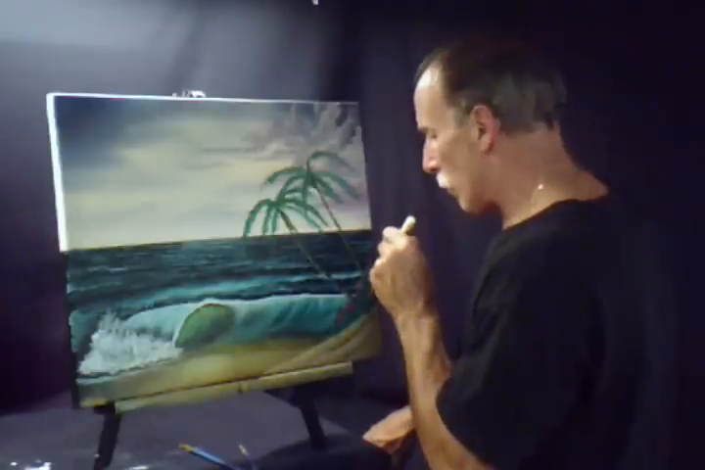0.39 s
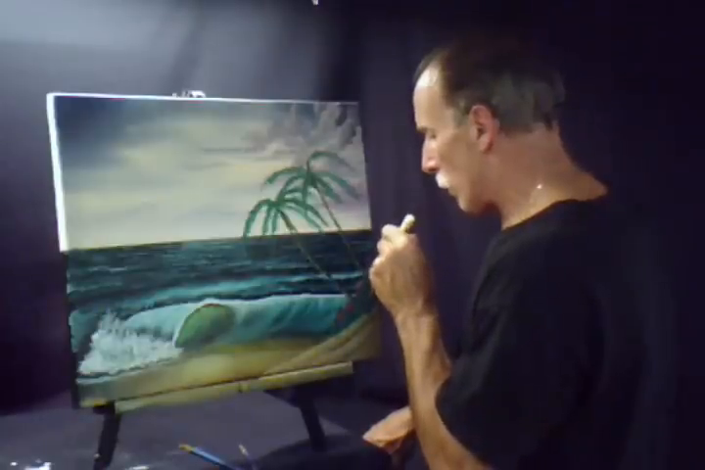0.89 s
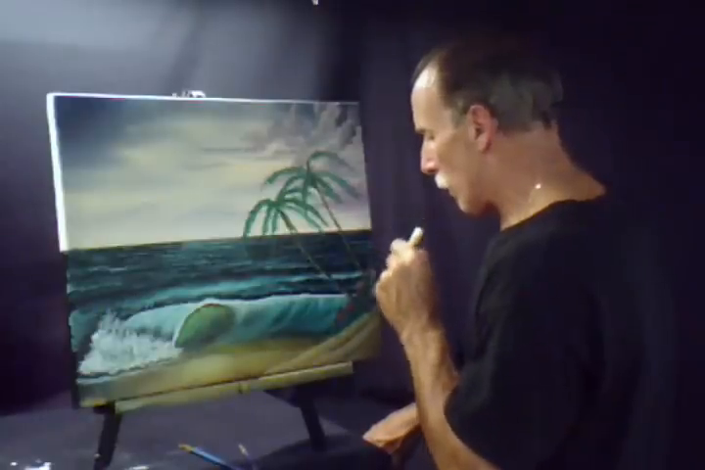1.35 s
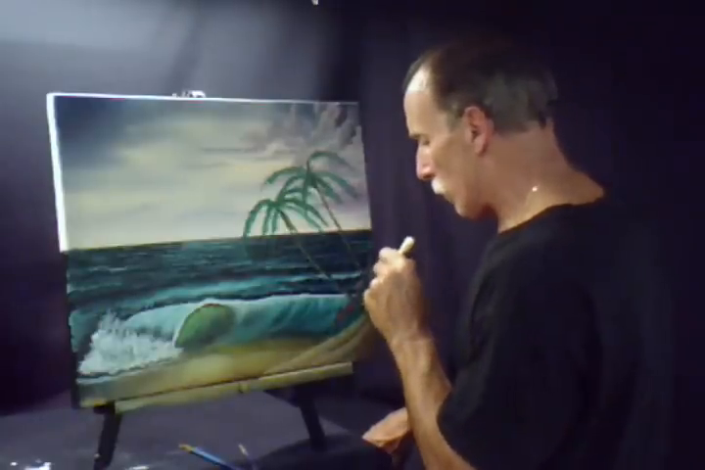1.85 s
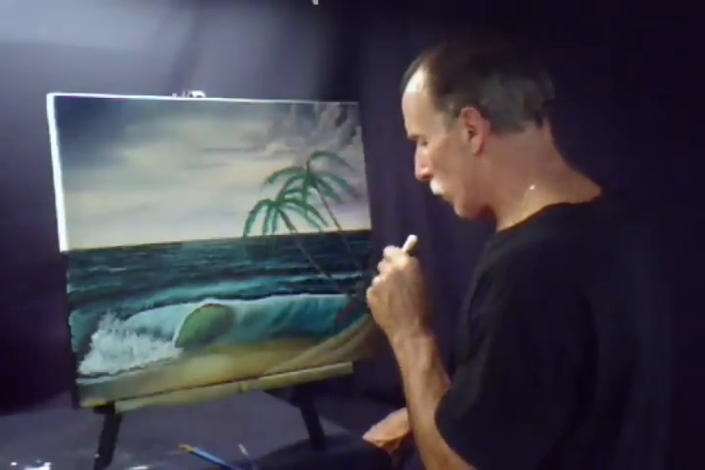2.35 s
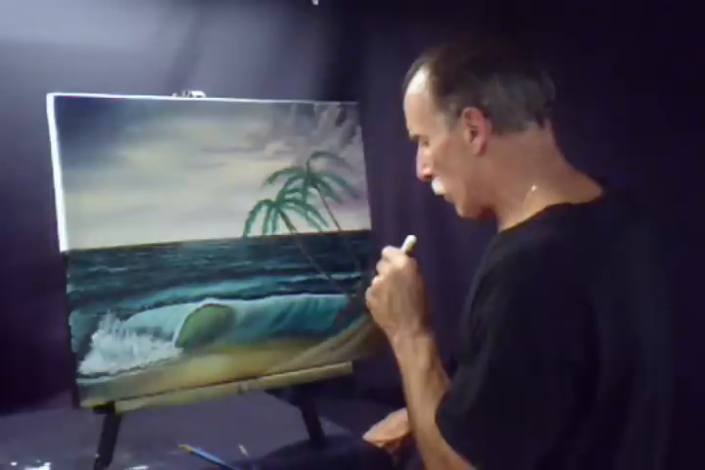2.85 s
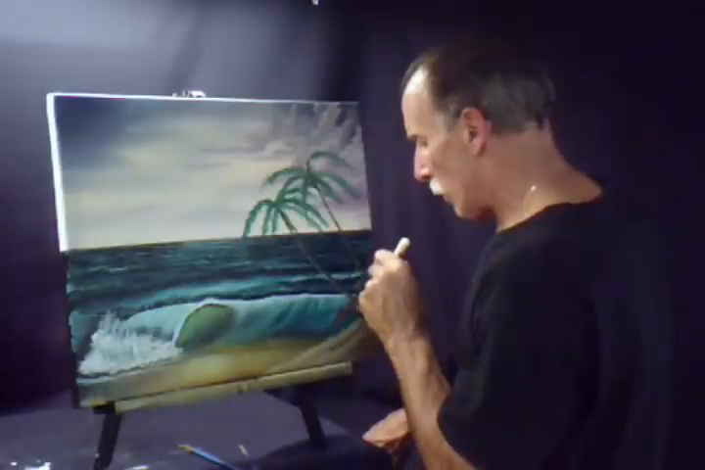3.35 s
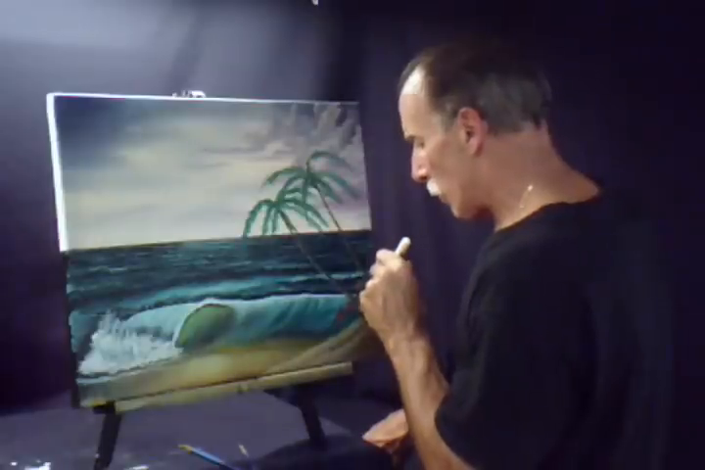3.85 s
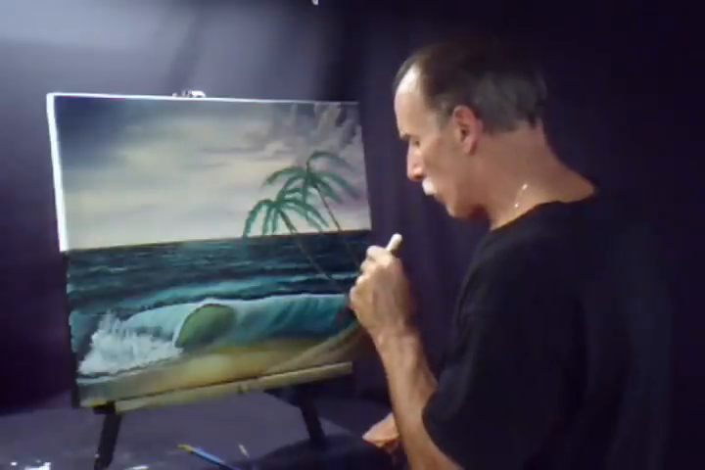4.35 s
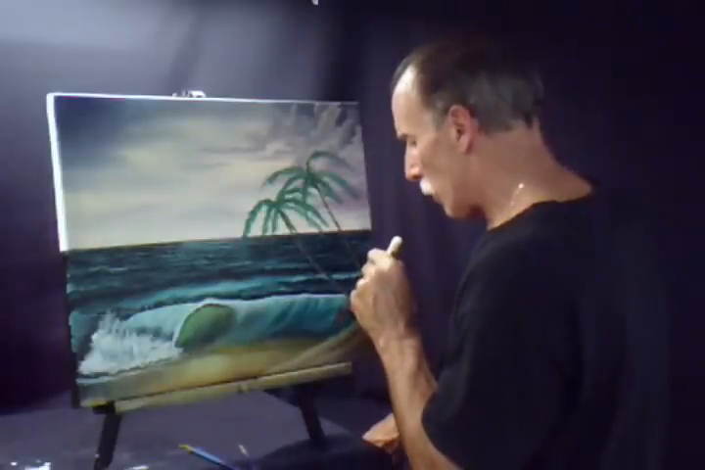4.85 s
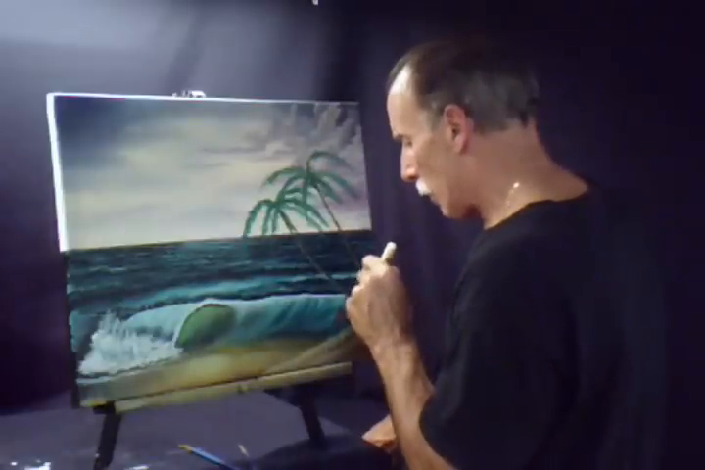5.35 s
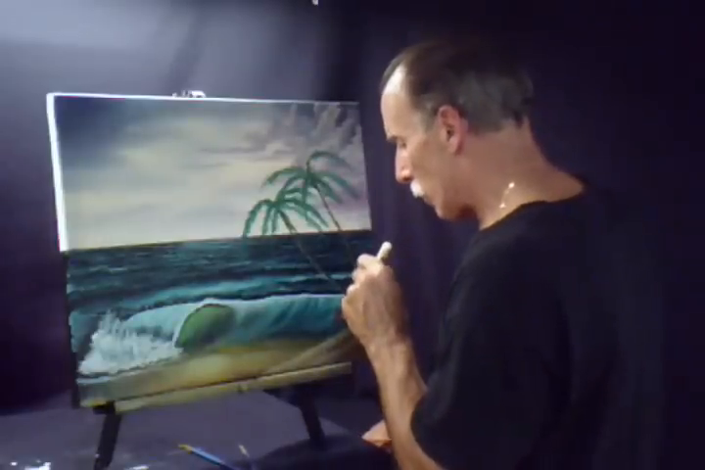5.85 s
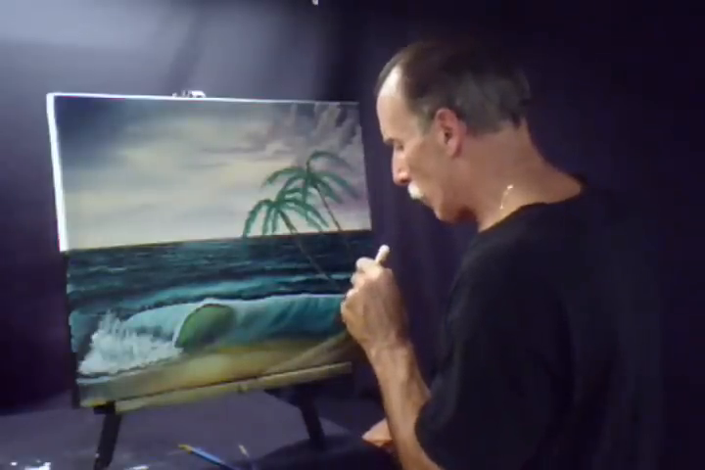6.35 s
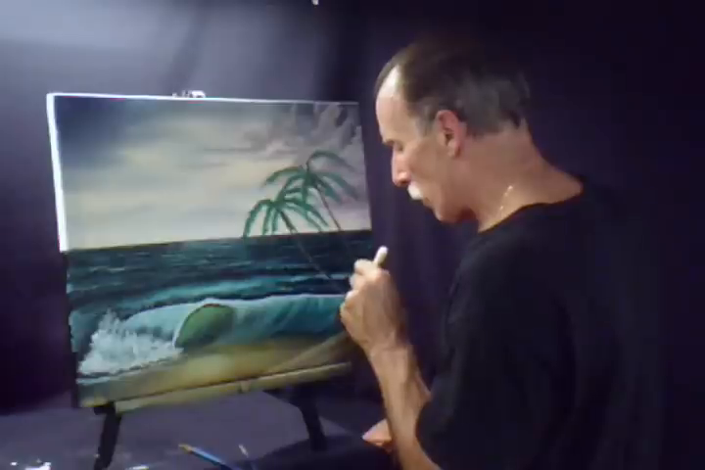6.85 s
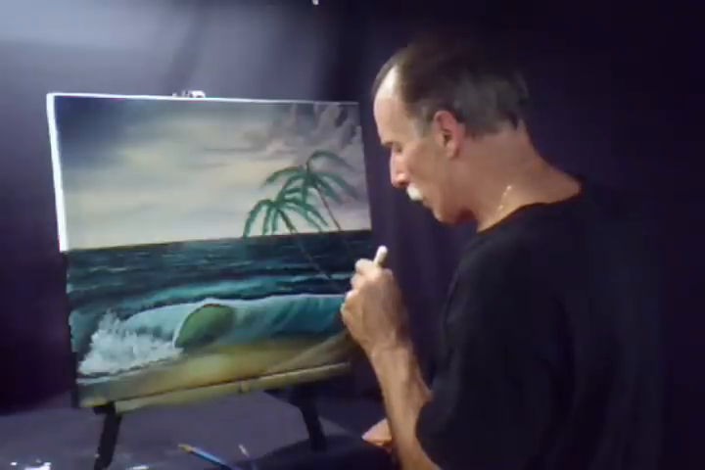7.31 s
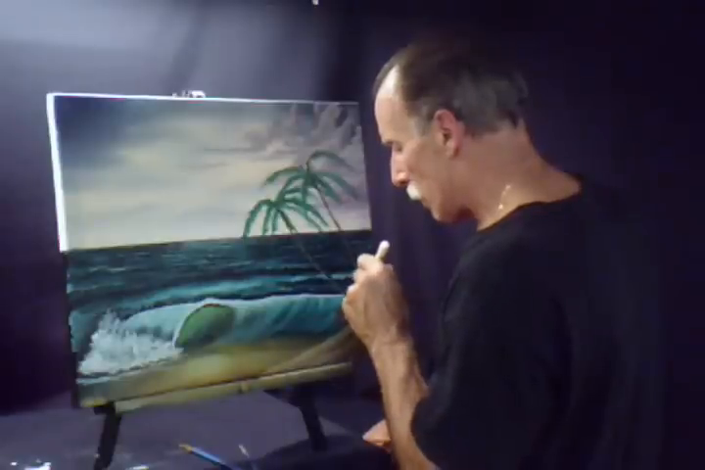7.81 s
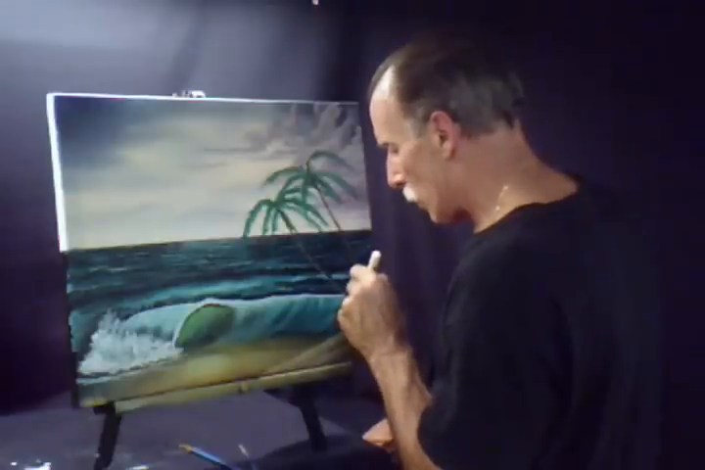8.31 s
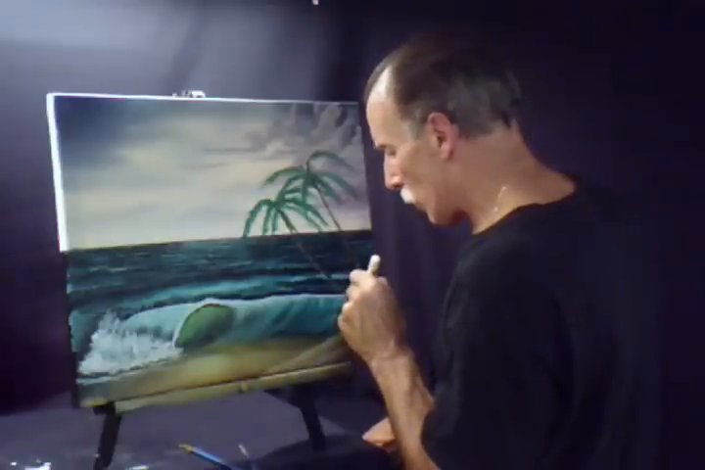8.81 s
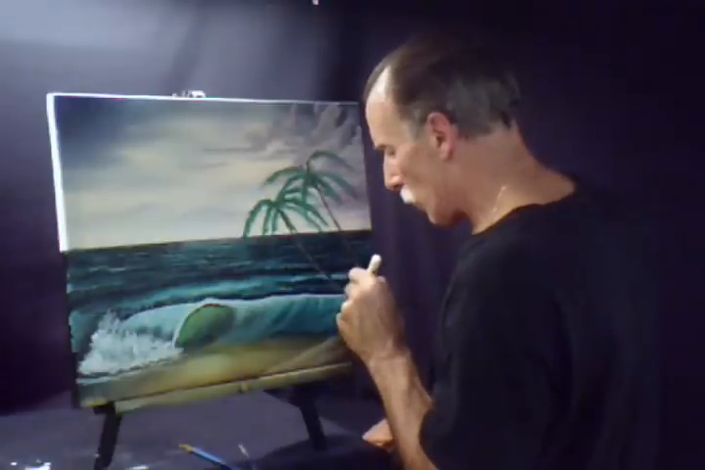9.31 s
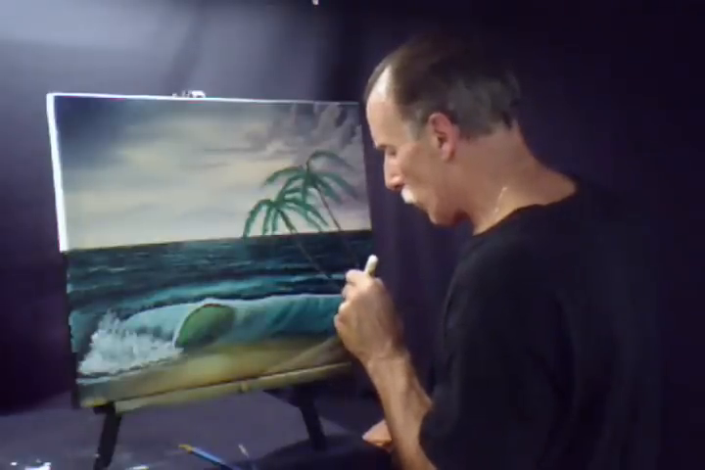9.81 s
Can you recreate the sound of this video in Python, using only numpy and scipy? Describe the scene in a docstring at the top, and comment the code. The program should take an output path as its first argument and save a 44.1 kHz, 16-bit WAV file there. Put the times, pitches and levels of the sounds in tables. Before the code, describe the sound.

A fast, regular run of soft electrical-sounding thumps with thin whine and crackle, over bassy rumble, faint whistles and a growing hum.

```python
"""Electrical thumps in a quiet room

Dull thumps, like a brush dabbing paint on canvas, fall on a tenth-of-a-second beat, skipping many beats.
They are electrical bursts leaking into a microphone line: each makes the line sag, with a thin whine and crackle.
Behind them are room rumble, two distant motors, hiss, faint whistles and tiny treble chirps, all from
shaped noise and sine waves. At listed times the level jumps, mostly down, and it creeps back up in between.
"""
import sys
import numpy as np
from scipy import signal
from scipy.io import wavfile

SR = 44100
rng = np.random.default_rng(int(sys.argv[2]) if len(sys.argv) > 2 else 0)


def put_to_file(sound):
    """Save the sound as 16-bit audio at rate SR, in the file named by the first command-line argument."""
    columns = np.atleast_2d(sound).T  # one column per channel
    safe = np.clip(columns, -1, 1)
    whole_steps = np.round(safe * 32767)
    wavfile.write(sys.argv[1], SR, whole_steps.astype(np.int16))


def decibels_to_gain(level_db):
    """Convert a level in decibels to a linear amplitude gain (20 dB per decade)."""
    exponent = np.asarray(level_db, float) / 20
    return 10 ** exponent


N = 438354  # length of the sound in samples

# Tone colour of the room rumble: (frequency [Hz], relative level [dB per Hz])
RUMBLE_SPECTRUM = [(7.1, -45), (12, -1), (32, 0.5), (43, 1), (64, -11.5), (113, -15), (168, -22),
                   (254, -22.5), (316, -27.5), (662, -37), (900, -37.5), (1170, -42.5), (1980, -120)]
# Tone colour of the hiss: (frequency [Hz], relative level [dB per Hz])
HISS_SPECTRUM = [(290, -8.5), (500, -0.5), (2610, -8.5), (4000, -10), (4280, -8.5), (5270, -11),
                 (5720, -9.5), (7430, -11), (9390, -11), (12900, -24.5), (13400, -45)]
# Resonances of the whine: (frequency [Hz], width [Hz], relative level [dB])
WHINE_RESONANCES = [(3130, 330, -7), (3500, 190, -6), (5570, 120, 3), (6030, 280, 1), (6500, 250, 0.5),
                    (6850, 170, 6), (8060, 380, -3.5), (8530, 1000, -11), (9580, 450, -5), (10280, 450, -8),
                    (11950, 200, -4.5)]
# Whistles of the electronics, before wavering and switching: (frequency [Hz], peak level [dB])
WHISTLES = [(1125, -67), (2901, -67.5), (4200, -64), (5802, -62.5), (6200, -76), (6318, -66.5), (7401, -87),
            (7768, -64.5), (9600, -60.5), (10800, -74), (12450, -81)]
# Bursts are short at first, one drags on weakly, then they stay long:
# (from time [s], delay [s], length [ms], sag [dB], whine [dB])
BURST_PHASES = [(0, 0.0013, 3.9, -1.5, -0.5), (2.7, -0.0044, 24.5, -7, -7), (2.9, -.0010, 16.6, 0.5, -0.5)]
# Strength added to those of the phases: (time [s], sag [dB], whine [dB])
BURST_STRENGTH = [(0, 4.5, 5.5), (1.4, -1, -2.5), (2.6, 1, -3), (2.95, -1.5, 1.5), (3.3, -2.2, 2.5),
                  (4.2, -2.2, 0.5), (6.5, -1.6, -0.5), (9.94, -2.8, -1.5)]
# Sudden steps of the microphone chain's level: (time [s], change [dB])
LEVEL_STEPS = [(3.0168, -13.5), (4.3177, -1.5), (4.99, 1.4), (5.0256, -7), (5.7223, -1), (5.926, -7),
               (6.837, -1.5), (7.2079, 1.7), (7.2432, -7), (7.544, -2.47), (8.1397, -1.88), (8.4507, -3.5),
               (9.1591, -3.5), (9.5535, -2.5)]
# Swell of rumble and hiss at the start: (time [s], change [dB])
START_SWELL = [(0, 1.2), (.35, 4), (.75, -0.05), (2.9, -0.16)]
# Growth of the motor hum, before its wavering: (time [s], level [dB])
HUM_GROWTH = [(0, -61), (4, -55), (5.2, -51), (6.6, -30), (8, -32), (9.94, -28)]

CLOCK_HZ, CLOCK_START_S = 19.862, 0.0445  # work-and-rest cycle of the electronics
# A burst is due at a steady pace but waits for the next beat (two clock cycles).
# So gaps are two beats, now and then one.
DUE_EVERY_BEATS, DUE_LEAD_BEATS = 1.8065, 0.435
AFTER_CLOCK_S, SCATTER_S = 0.0067, 0.0009
LENGTH_SCATTER, SAG_SCATTER_DB, WHINE_SCATTER_DB = 0.06, 0.6, 0.7  # length as a fraction
SOON_AFTER_DB = -0.8  # change of sag for a burst only one beat after another
CLIMB_DB_PER_S, CEILING_DB = 7, 4.5
HEADROOM = 1.74  # rounded peaks stay below this
TOP_HZ = 10660  # treble roll-off of the converter
OFFSET = 0.008  # constant shift of the wave


def rms_one(x):
    """Scale a signal so that its rms is 1."""
    return x / np.sqrt(np.mean(x ** 2) + 1e-20)


def lag(x, ms):
    """Follow a signal sluggishly: a one-pole low-pass with a time constant in ms."""
    r = np.exp(-1000 / (ms * SR))
    return signal.lfilter([1 - r], [1, -r], x)


def drift(rate):
    """Slow random wandering of rms 1; a higher rate [Hz] wanders faster."""
    # Worked out at every 40th sample, then joined by straight lines
    r = np.exp(-80 * np.pi * rate / SR)
    noise = rng.standard_normal(N // 40 + 2002)
    slow = signal.lfilter([1], [1, -2 * r, r * r], noise)[2000:]
    return np.interp(np.arange(N) / 40, np.arange(len(slow)), rms_one(slow))


def coloured(spectrum, patchy_db, rate, shared=0.87):
    """Noise of rms 1 built from bands, each with its own level and flicker plus a shared flicker."""
    hz, db = np.transpose(spectrum)
    bands = int(2.5 * np.log2(hz[-1] / hz[0]))  # about 2.5 bands per octave
    edges = np.geomspace(hz[0], hz[-1], bands + 1)
    white = rng.standard_normal((2, N + SR))  # the first second lets the filters settle
    together = drift(rate)
    out = 0
    for k, (low, high) in enumerate(zip(edges, edges[1:])):
        band_filter = signal.butter(2, [low, high], "band", fs=SR, output="sos")
        band = signal.sosfilt(band_filter, white[k % 2])[SR:]
        level_db = np.interp(np.log(low * high) / 2, np.log(hz), db)
        flicker_db = patchy_db * (shared * together + drift(rate))
        out = out + band * decibels_to_gain(level_db + flicker_db)
    return rms_one(out)


def clock():
    """The electronics work half of each clock cycle and rest in the other: 1 or 0, edges rounded."""
    t = np.arange(N) / SR
    working = (t - CLOCK_START_S) * CLOCK_HZ % 1 < 0.5
    return lag(working, 0.57)


def swell_db():
    """Shared rise and fall of rumble and hiss in dB."""
    return np.interp(np.arange(N) / SR, *np.transpose(START_SWELL))


def room_rumble():
    """Low rumble of the room: flickering bass noise."""
    noise = coloured(RUMBLE_SPECTRUM, patchy_db=0.88, rate=13.8, shared=1.55)
    return decibels_to_gain(-31 + swell_db()) * noise


def wavering_sine(hz, level_db):
    """A sine wave whose pitch and level may change from sample to sample."""
    return decibels_to_gain(level_db) * np.sin(2 * np.pi * np.cumsum(hz) / SR)


def motors():
    """Two distant motors: a hum that grows and a steadier drone, both wavering in pitch and level."""
    growth_db = np.interp(np.arange(N) / SR, *np.transpose(HUM_GROWTH))
    hum = wavering_sine(56.8 + 0.95 * drift(1.67), growth_db + 1.5 * drift(1.9))
    drone = wavering_sine(87.8 + 0.883 * drift(1.67), -44 + 3.5 * drift(3.7))
    return hum + drone


def microphone_hiss():
    """Hiss of the microphone: treble noise, a little louder while the electronics work."""
    level_db = -51.5 + swell_db() + 1.2 * clock()
    return decibels_to_gain(level_db) * coloured(HISS_SPECTRUM, patchy_db=0.9, rate=15)


def converter_hiss():
    """The converter's own hiss: the same tone colour with a slower, deeper flicker."""
    return decibels_to_gain(-56) * coloured(HISS_SPECTRUM, patchy_db=1.5, rate=4.7)


def whistles():
    """Faint tones of the electronics, switched by the clock and wavering in strength."""
    t = np.arange(N) / SR
    lines = 0
    for hz, db in WHISTLES:
        strength = decibels_to_gain(db + 0.54 * drift(12))
        phase = 2 * np.pi * (hz * t + rng.random()) + 0.42 * drift(40)
        lines = lines + strength * np.sin(phase)
    return lines * clock()


def chirps(base_db=-52, size_db=1.5, count=320):
    """Tiny treble sweeps of a few milliseconds, up or down, around the working half of the clock cycle."""
    out = np.zeros(N + SR)
    for when, phase, pitch, sweep, length, size in rng.random((count, 6)):
        cycle = int(when * N / SR * CLOCK_HZ)
        start = int((CLOCK_START_S + (cycle + 0.57 * phase - 0.1) / CLOCK_HZ) * SR)
        n = int((0.00305 + 0.0042 * length) * SR)
        octaves = 1.9 * (sweep - 0.35) * np.linspace(-0.5, 0.5, n)
        hz = (5500 + 6000 * pitch) * 2 ** octaves
        tone = np.hanning(n) * np.sin(2 * np.pi * np.cumsum(hz) / SR)
        out[start:start + n] += decibels_to_gain(base_db + size_db * np.log(size + 0.054)) * tone
    return out[:N]


def bursts():
    """Start [s], length [ms], sag [dB] and whine [dB] of each burst; one close after another sags less."""
    beat = np.ceil(np.arange(55) * DUE_EVERY_BEATS - DUE_LEAD_BEATS)
    chance = rng.standard_normal((len(beat), 4))
    start = CLOCK_START_S + AFTER_CLOCK_S + 2 * beat / CLOCK_HZ + SCATTER_S * chance[:, 0]
    since, delay, ms, sag_db, whine_db = np.array(BURST_PHASES).T
    k = np.clip(np.searchsorted(since, start) - 1, 0, None)  # phase of each burst
    start = start + delay[k]
    at, sag_curve, whine_curve = np.transpose(BURST_STRENGTH)
    soon = np.diff(beat, prepend=-2) == 1
    length_ms = ms[k] * (1 + LENGTH_SCATTER * chance[:, 1])
    sag = sag_db[k] + np.interp(start, at, sag_curve)
    sag = sag + SOON_AFTER_DB * soon + SAG_SCATTER_DB * chance[:, 2]
    whine_level = whine_db[k] + np.interp(start, at, whine_curve)
    whine_level = whine_level + WHINE_SCATTER_DB * chance[:, 3]
    return start, length_ms, sag, whine_level


def gate(start, ms, db):
    """On while a burst lasts, at the height given for each burst."""
    edges = np.zeros(N + SR)
    np.add.at(edges, (start * SR).astype(int), decibels_to_gain(db))
    np.add.at(edges, ((start + ms / 1000) * SR).astype(int), -decibels_to_gain(db))
    return np.cumsum(edges)[:N]


def throb(start, depth, hz=162, first_s=0.0058):
    """The current inside a burst comes in packets, counted from its start."""
    t = np.arange(N) / SR
    latest = np.clip(np.searchsorted(start, t) - 1, 0, None)
    since = t - start[latest]
    return 1 + np.clip(depth, 0, 1) * np.cos(2 * np.pi * hz * (since - first_s))


def crackle(start, busy):
    """Broad rough noise that throbs and fades in and out with each burst."""
    band = signal.butter(1, [250, 5000], "band", fs=SR, output="sos")
    noise = rms_one(signal.sosfilt(band, lag(rng.standard_normal(N), 0.2)))
    return decibels_to_gain(-49) * noise * throb(start, depth=0.4) * lag(busy, 1.2)


def whine(start, busy):
    """Noise rings in narrow treble resonances, throbbing, and fades in and out with each burst."""
    white = rng.standard_normal(N)
    out = 0
    for k, (hz, width, db) in enumerate(WHINE_RESONANCES):
        r = np.exp(-np.pi * width / SR)
        ring = signal.lfilter([1, 0, -1], [1, -2 * r * np.cos(2 * np.pi * hz / SR), r * r], white)
        out = out + (-1) ** k * decibels_to_gain(db) * (1 - r * r) * ring  # neighbours have opposite signs
    return decibels_to_gain(-44) * rms_one(out) * throb(start, depth=0.3) * lag(busy, 2.8)


def thumps(drain, supply_ms=9.5, edge_ms=0.22, coupling_hz=4.0, damping=1.15):
    """The line sags through a smoothing filter; coupling capacitors make it overshoot on the way back."""
    sag = -lag(lag(drain, supply_ms), edge_ms)
    w = 2 * np.pi * coupling_hz
    high_pass = signal.bilinear([1, 0, 0], [1, 2 * damping * w, w * w], SR)
    return signal.lfilter(*high_pass, sag)


def stepping_gain():
    """The level climbs steadily up to a ceiling; each listed step moves it at once."""
    s, db = np.transpose(LEVEL_STEPS)
    change = np.full(N, CLIMB_DB_PER_S / SR)
    np.add.at(change, (s * SR).astype(int), db)
    free = np.cumsum(change)
    return decibels_to_gain(CEILING_DB + free - np.maximum.accumulate(free))


def scene():
    """Everything on the microphone line, as one channel."""
    start, ms, sag_db, whine_db = bursts()
    busy = gate(start, ms, whine_db)
    background = room_rumble() + motors() + microphone_hiss() + chirps()
    burst_sound = crackle(start, busy) + whine(start, busy) + thumps(gate(start, ms, sag_db))
    return (background + burst_sound)[None]


def band_limit(x):
    """A steep low-pass at the top of the band."""
    return signal.sosfilt(signal.butter(12, 13580, fs=SR, output="sos"), x)


def record(dry):
    """Stepping level, rounded peaks and the converter's treble roll-off, then hiss, whistles and offset."""
    gain = stepping_gain()
    rounded = HEADROOM * np.tanh(dry * gain / HEADROOM)
    line = signal.sosfilt(signal.butter(6, TOP_HZ, fs=SR, output="sos"), rounded)
    own_noise = converter_hiss() + whistles() * np.sqrt(gain)  # whistles follow half the dB steps
    return band_limit(line + own_noise + OFFSET)


dry = scene()
out = record(dry)
put_to_file(out)
```